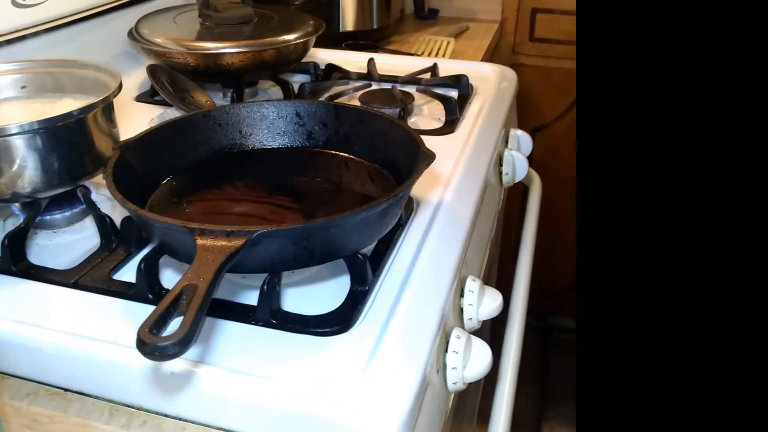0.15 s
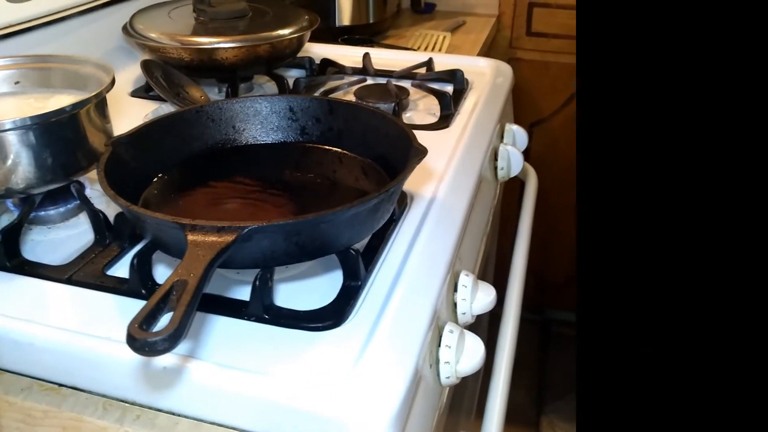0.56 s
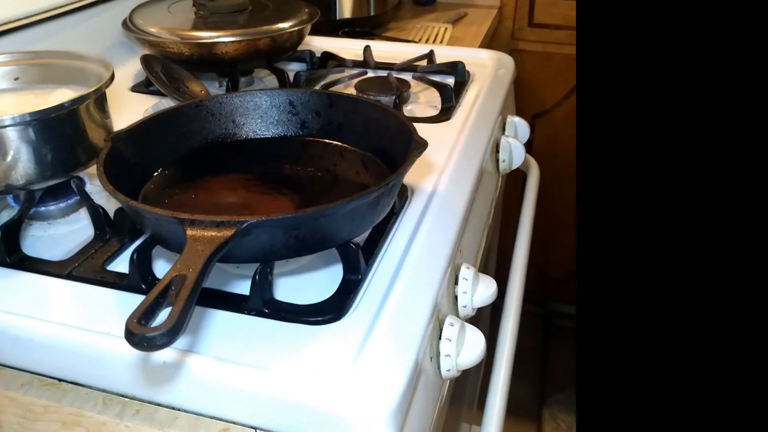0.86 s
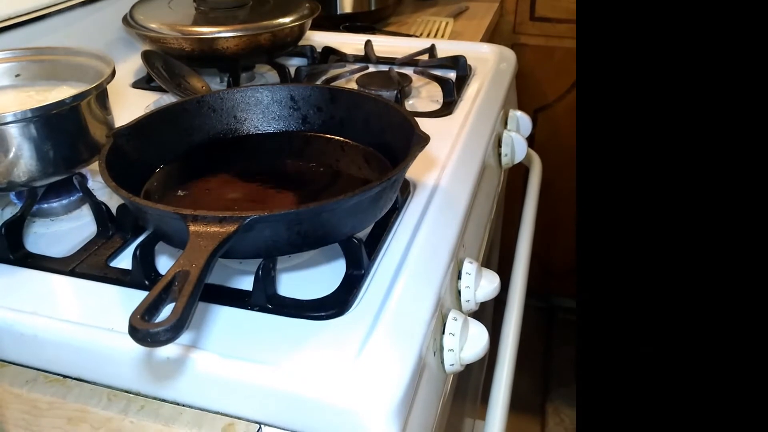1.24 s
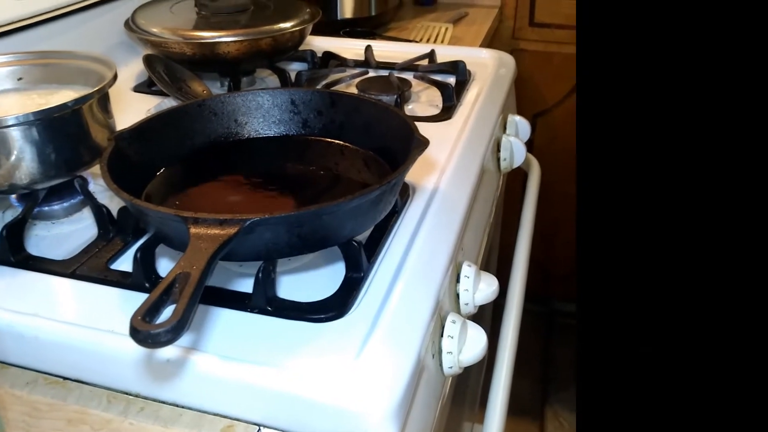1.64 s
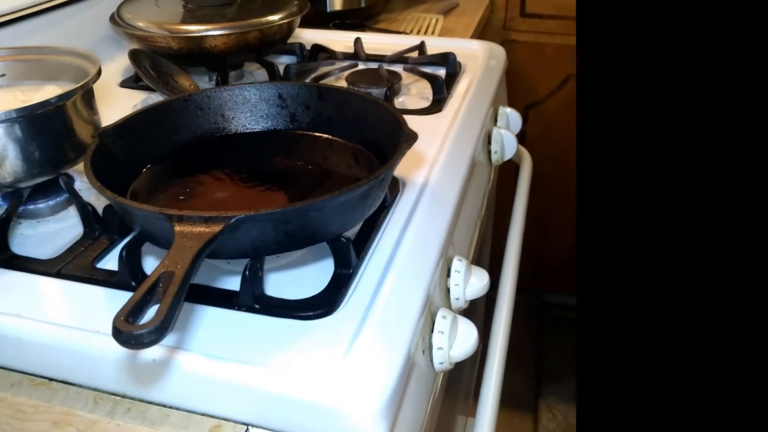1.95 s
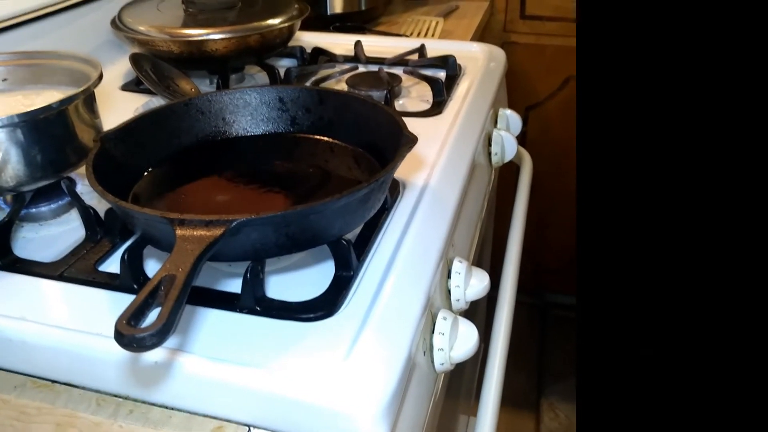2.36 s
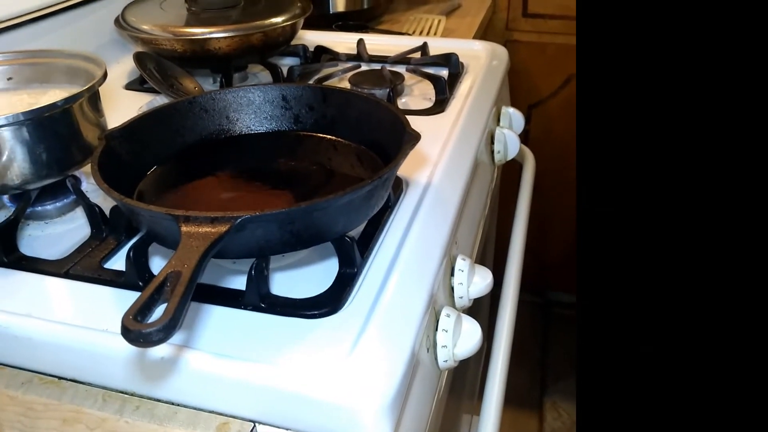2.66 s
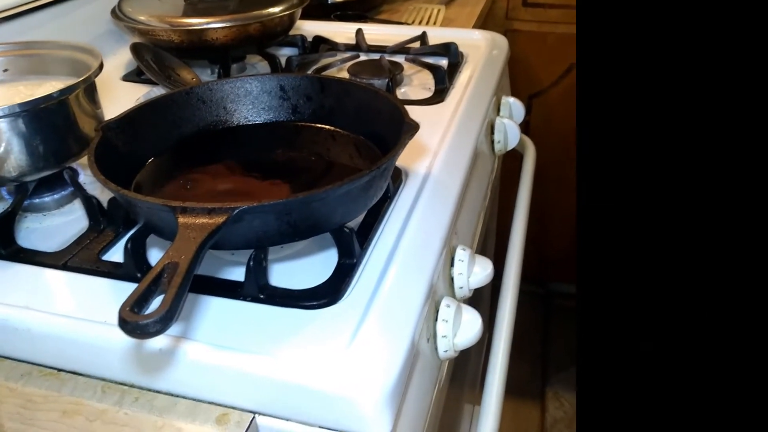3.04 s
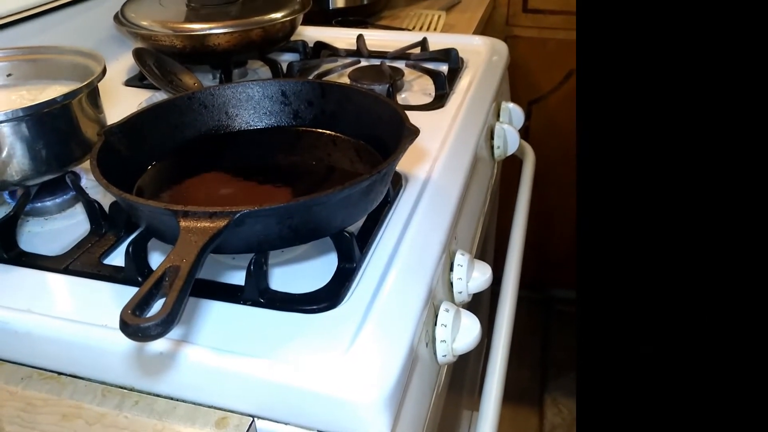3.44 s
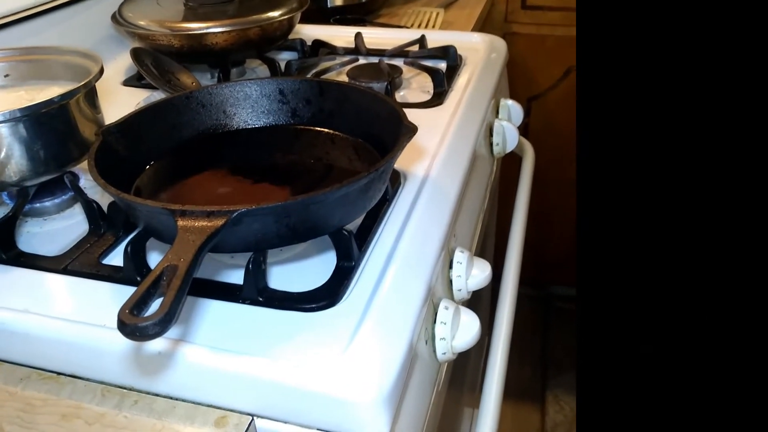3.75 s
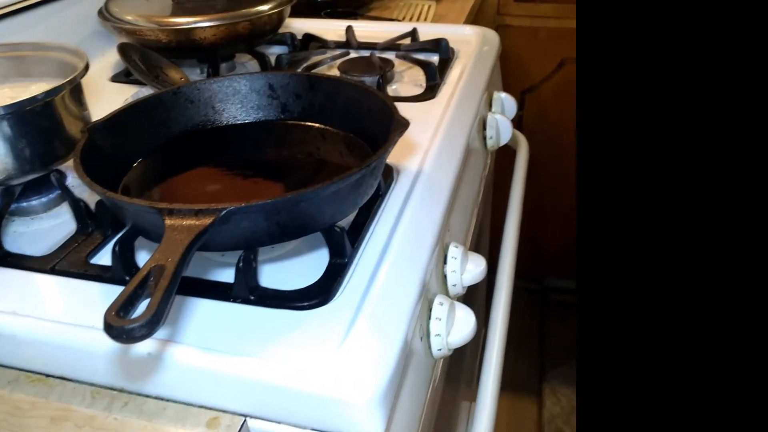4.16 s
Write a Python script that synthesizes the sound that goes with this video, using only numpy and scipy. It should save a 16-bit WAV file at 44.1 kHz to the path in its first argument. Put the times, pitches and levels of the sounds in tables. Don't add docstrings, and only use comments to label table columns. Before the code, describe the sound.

Water drops snap, crackle and spit in hot oil in a cast iron skillet, dense at first, then thinning to scattered pops.

```python
import sys
import numpy as np
from scipy import signal
from scipy.io import wavfile
from scipy.ndimage import uniform_filter1d

SR = 44100
rng = np.random.default_rng(int(sys.argv[2]) if len(sys.argv) > 2 else 0)


def amp(db):
    return 10 ** (np.asarray(db, float) / 20)


def write(x):
    x = np.atleast_2d(x).T
    wavfile.write(sys.argv[1], SR, np.round(np.clip(x, -1, 1) * 32767).astype(np.int16))


N = 189630

# t/s, peak level/dB, f/Hz, blow on the iron/dB
LARGE = [(0.0784, -11.5, 3040, 2.5), (0.2213, -5.5, 3100, 4.5), (0.2927, -1.5, 3150, 5),
         (0.394, -8, 2490, -6.5), (0.4066, -6, 3020, -1.5), (0.5276, -14.5, 3180, 12.5),
         (0.637, 0.5, 3090, 2), (0.7212, -6.5, 2900, 2), (0.7864, 0, 2340, -3.5), (0.824, 5.5, 2970, -2),
         (0.9914, -8, 2470, -8), (1.1757, -7, 3000, -1), (1.23, -1, 2920, -3.5), (1.265, -2.5, 2360, -31),
         (1.2996, -9.5, 2810, 5), (1.459, -10.5, 2780, 6.5), (1.7679, -3, 2770, -7.5),
         (1.925, 2, 3000, -4.5), (2.0626, -8.5, 3010, 1.5), (2.204, -10.5, 3100, -3),
         (2.2778, -9, 3090, 3.5), (2.3683, -6, 3080, -13), (2.3929, 0, 2280, -44),
         (2.4932, -7.5, 2470, -3.5), (2.613, -12.5, 2760, -9), (2.7893, -5.5, 2436, -4.5),
         (2.9558, -2, 2750, 1), (3.581, -4.5, 2820, -2.5), (3.7497, -8, 2760, 0), (4.1757, -6, 3065, 2)]
# t/s, peak level/dB, f/Hz
MIDDLE = [(0.0623, -6, 3580), (0.1227, -3.5, 4030), (0.2867, -2.5, 3670), (0.3007, 2.5, 3830),
          (0.36, -1, 3620), (0.491, -6.5, 3620), (0.6346, -7.5, 3530), (0.6812, 4.5, 3690),
          (0.754, -4.5, 3740), (0.9366, -2, 3600), (1.1215, -9, 3580), (1.1549, -2.5, 3660),
          (1.4421, -11, 3360), (1.629, -10, 3200), (1.712, -10, 3450), (1.7609, -9.5, 4050),
          (1.9083, -9.5, 3720), (1.9792, -5, 3690), (2.0652, -5.5, 3770), (2.1307, -4, 3410),
          (2.3568, -5, 3720), (2.591, -3.5, 3560), (2.649, -9, 4560), (3.2695, -16, 3550),
          (3.376, -10, 3340), (3.5048, -3.5, 4180), (3.553, -10.5, 3240), (3.6193, -9, 3684),
          (3.9429, -9, 3640)]
# t/s, peak level/dB, f/Hz
LESSER = [(0.1002, -14, 4430), (0.2224, -14, 4740), (0.2718, -13.5, 4500), (0.2763, -6.5, 4800),
          (0.609, -10, 5150), (0.6444, -7.5, 4860), (0.8904, -0.5, 5440), (1.0186, -12, 4800),
          (1.0879, -22, 5160), (1.1348, -13, 5200), (1.2496, -7, 5230), (1.2845, -7, 5200),
          (1.3279, -10, 4300), (1.5369, -11, 5150), (1.705, -11.5, 4660), (1.8002, -3, 4530),
          (2.2333, -12.5, 5000), (2.2782, -6.5, 4550), (2.5052, -11, 5570), (2.6738, -2, 4630),
          (2.7716, -16.5, 4550), (2.9377, -9.5, 4730), (2.9437, -18, 4640), (3.0101, -10, 4660),
          (3.0764, -4.5, 4740), (3.1772, -13, 4560), (3.7963, -13, 4500), (3.8312, -12, 4790),
          (3.8826, -7, 4460), (4.1198, -12, 4930)]
# t/s, peak level/dB, f/Hz
SMALL = [(0.1128, -3, 5840), (0.1905, -10.5, 5770), (0.2182, -15, 6160), (0.2513, -2.5, 6170),
         (0.392, -14.5, 5940), (0.4927, -7.5, 5850), (0.6649, -6, 5850), (0.7091, -11.5, 6500),
         (0.9881, -9, 6100), (1.1903, -7.5, 5300), (1.2425, -13, 6040), (1.3763, -9, 6000),
         (1.5604, -2, 5700), (1.7753, -13.5, 5730), (1.8866, -15.5, 5700), (1.94, -8.5, 5300),
         (2.0152, -12.5, 5700), (2.1489, -12, 6100), (2.1959, -9.5, 5940), (2.409, -8.5, 6450),
         (2.6968, -9, 5840), (2.9016, -10.5, 6220), (3.046, -11, 5850), (3.2817, -6, 5680),
         (3.5038, -11, 6140), (3.5473, -8, 5840), (3.7105, -18.5, 5900), (3.7815, -14.5, 5530),
         (3.7968, -11, 6330), (4.022, -19, 6160)]
# t/s, peak level/dB, f/Hz
TINY = [(0.0393, -15, 7600), (0.248, -15.5, 6900), (0.3557, -10, 6330), (0.5556, -11, 6530),
        (0.8607, -13, 6960), (1.055, -11, 7000), (1.15, -12.5, 6430), (1.4957, -11.5, 6450),
        (1.7418, -16, 7600), (1.858, -14.5, 6600), (1.9725, -10.5, 6360), (2.0337, -12.5, 6700),
        (2.3122, -11, 7300), (2.4789, -14.5, 7500), (2.574, -16, 7670), (2.6745, -15.5, 9000),
        (2.7549, -5, 6630), (3.1034, -19.5, 7800), (3.1847, -13, 7060), (3.241, -12.5, 6500),
        (3.3075, -11, 7000), (3.3514, -12.5, 7160), (3.488, -25, 6100), (3.6547, -5, 6220),
        (3.871, -15.5, 6500), (3.922, -20, 9400), (3.9415, -14.5, 6360), (4.1087, -14, 6930),
        (4.278, -12.5, 6500)]
# t/s, peak level/dB, f/Hz
FURTHER = [(0.6405, -14, 6800), (0.819, -18.5, 8340), (0.821, -8.5, 3920), (0.823, -15.5, 5430),
           (1.0972, -13.5, 4140), (1.4038, -11.5, 3830), (1.4148, -10, 3620), (1.4284, -21.5, 6450),
           (1.4971, -9.5, 3730), (1.6292, -16, 6200), (1.7943, -14, 3700), (1.816, -18, 6800),
           (2.6503, -12.5, 3020), (2.965, -10.5, 2800), (3.178, -20, 6500), (3.928, -16.5, 4640),
           (4.165, -23.5, 6600)]
# t/s, peak level/dB, f/Hz
OPENING = [
    (.001, -17.5, 6400),
    (.002, -9, 3720),
    (.002, -12.5, 6670),
    (.003, -14.5, 2730),
]
# f/Hz, level/dB
IRON = [(1437, -57), (1723, -56), (2132, -41), (2503, -39), (2680, -49), (2900, -49), (2982, -37),
        (3350, -51), (3892, -31), (3973, -41), (4393, -45), (4942, -34.5), (5044, -49), (5480, -48),
        (5771, -46), (5981, -41), (6045, -39), (6115, -42), (6298, -43), (6428, -45), (6498, -43),
        (6756, -40), (7009, -48), (7348, -49), (7553, -50), (7698, -46), (7779, -47), (7903, -46),
        (8253, -49), (8436, -49), (8877, -56), (9249, -58), (10500, -60), (11768, -62)]


def rms_one(x):
    return x / np.sqrt(np.mean(x ** 2) + 1e-20)


def in_time(rows):
    s, *columns = np.transpose(rows)
    return [np.interp(np.arange(N) / SR, s, c) for c in columns]


def at_hz(points, hz):
    f, value = np.array(points).T[:2]
    return np.interp(np.log(hz), np.log(f), value)


def ring(clicks, hz, t60):
    r, w = amp(-60 / (t60 * SR)), 2 * np.pi * hz / SR
    return signal.lfilter([0, np.sin(w)], [1, -2 * r * np.cos(w), r * r], clicks + 1e-18)


def clicks_at(seconds, sizes):
    return np.bincount(np.clip((seconds * SR).astype(int), 0, N - 1), sizes, N)


def band_pass(x, low_hz, high_hz):
    return signal.sosfilt(signal.butter(2, [low_hz, high_hz], "band", fs=SR, output="sos"), x)


def ticks(rows, low_hz, high_hz, level_db):
    s, db = np.transpose(rows)
    return band_pass(clicks_at(s, amp(db + level_db)) + 1e-18, low_hz, high_hz)


def coloured(x, spectrum):
    edges = 24 * 2 ** np.arange(0, 9.6, .5)
    return sum(amp(at_hz(spectrum, np.sqrt(low * high))) * band_pass(x, low, high)
               for low, high in zip(edges, edges[1:]))


def echo(x, t60, onset_s):
    t = np.arange(SR // 2) / SR
    white = rng.standard_normal(len(t))
    edges = 200 * 2 ** np.arange(0, 6.6, .5)
    tail = 0
    for low, high in zip(edges, edges[1:]):
        tail = tail + band_pass(white, low, high) * amp(-60 * t / at_hz(t60, np.sqrt(low * high)))
    tail = tail * (1 - np.exp(-t / onset_s))
    return signal.fftconvolve(x, tail / np.sqrt(np.sum(tail ** 2)))[:N]


def bubbles(rows, cycles, rise, swell_s):
    out = np.zeros(N + SR)
    for (s, db, hz), turns in zip(rows, cycles):
        t = np.arange(int(min(turns / hz, .5) * SR) + 2) / SR
        life = t * hz / turns
        shape = amp(db - 60 * life) * (1 - np.exp(-t / swell_s)) ** 2
        at = int(s * SR)
        out[at:at + len(t)] += shape * np.sin(2 * np.pi * hz * t * (1 + rise * life))
    return out[:N]


def room_tone():
    # f/Hz, rms level/dB
    motor = [
        (59.2, -60.5),
        (156.1, -73),
    ]
    # f/Hz, level/dB
    kitchen = [(25, -17), (60, -11), (200, -21.5), (600, -38), (1500, -27), (4000, -17), (16000, -54)]
    # t/s, level/dB
    gain = [(0, -54), (.6, -73), (1.2, -69.5), (2.0, -62.5), (4.3, -59.5)]
    t = np.arange(N) / SR
    flutter = rms_one(signal.lfilter([1], [1, -1.99, .990025], rng.standard_normal(N)))
    hum = sum(amp(db - motor[0][1]) * np.sin(2 * np.pi * hz * t) for hz, db in motor)
    hum = hum * (1 + .2 * flutter)
    hiss = rms_one(coloured(rng.standard_normal(N), kitchen))
    return amp(in_time(gain)[0]) * (amp(8.0) * hum + amp(12.5) * hiss)


def simmer():
    # t/s, peak level/dB, f/Hz
    slow = np.array([(0.176, -54, 475), (0.291, -37, 1115), (0.43, -34, 866), (0.455, -30.5, 493),
                     (0.525, -35, 465), (1.461, -37, 890), (1.565, -35, 926), (1.697, -34.5, 917),
                     (1.756, -32, 555), (2.147, -42, 354), (2.312, -33, 987), (2.911, -41, 354),
                     (3.107, -39.5, 936), (3.146, -40, 368), (3.321, -40, 980), (3.372, -35.5, 592),
                     (3.399, -32.5, 500), (3.457, -36, 923), (3.605, -38, 980), (3.712, -37, 335),
                     (3.717, -36, 585), (3.754, -41, 334), (3.793, -37, 598), (3.96, -40, 389),
                     (4.0, -38, 361), (4.003, -35, 994), (4.045, -37, 370), (4.166, -32, 985)])
    # t/s, level/dB
    froth_level = [(0, -49), (.4, -44), (1.2, -57), (2.5, -63), (4.3, -62)]
    chance = rng.random((260, 3))
    when = chance[:, 0] * N / SR
    froth_db = np.interp(when, *np.transpose(froth_level)) + 9 * chance[:, 1]
    small = np.transpose([when, froth_db, 300 * 3.35 ** chance[:, 2]])
    froth = bubbles(small, small[:, 2] * 0.06, rise=0.36, swell_s=0.00042)
    wobble = rms_one(signal.lfilter([1], [1, -1.98, .9801], rng.standard_normal(N)))
    big = bubbles(slow, slow[:, 2] * 0.098, rise=0.138, swell_s=0.0043)
    return big * (1 + 0.55 * wobble) + froth


def thumps():
    # t/s, peak level/dB
    thrown = [(0.225, -31), (0.182, -15.5), (0.293, -13.5), (0.324, -12), (0.43, -17), (0.53, -30),
              (0.639, -26), (0.719, -23), (0.785, -16.5), (0.824, -19.5), (0.943, -20), (1.277, -23),
              (1.441, -32), (1.566, -32.5), (1.886, -26), (1.924, -25.5), (2.129, -31.5), (2.389, -21),
              (2.489, -23.5), (2.593, -30), (2.788, -21), (2.965, -26), (3.076, -31.5), (3.578, -31),
              (4.169, -30)]
    # f/Hz, T60/s
    slosh_t60 = [(300, 0.015), (1300, 0.12)]
    thud = ticks(np.add(thrown, [.003, 0]), 425, 2900, 24.2)
    splash = ticks([row[:2] for row in LARGE + MIDDLE], 61, 1140, -8.0)
    return thud + splash + amp(-0.5) * echo(thud, slosh_t60, onset_s=0.0013)


def spits():
    # t/s, peak level/dB
    spat = [(0.0997, -12), (0.3197, 11.5), (0.3611, 0), (0.4903, 2.5), (1.242, -23), (1.3758, 2.5),
            (1.5354, -15), (1.7495, -6), (1.8899, 5), (2.1288, 3), (2.1954, -14), (2.3116, -8),
            (2.4603, -16), (2.5257, -11), (2.7313, -5), (2.8452, -6), (2.884, -17), (3.0693, 4),
            (3.1423, -9), (3.243, -18), (3.5064, -1), (3.6174, -8), (3.7223, -23), (3.7744, -10),
            (4.0477, -5.5), (4.11, -3), (4.1954, -23)]
    return ticks(spat, 4050, 9500, 9)


def mist(drops):
    # t/s, peak level/dB
    finest = [(0.0782, -24), (0.1246, -26), (0.1645, -19), (0.2728, -16), (0.3197, -23), (0.3611, -18),
              (0.4055, -14), (0.4663, -12), (0.5516, -20), (0.5746, -12), (0.6684, -22), (0.6814, -16),
              (0.8215, -13), (0.8594, -28.5), (1.2261, -15), (1.2431, -27), (1.3274, -20), (1.3758, -30),
              (1.493, -22), (1.5349, -33), (1.7045, -26), (1.8582, -32), (1.8886, -14), (2.1301, -14),
              (2.1405, -18), (2.3326, -24), (2.4084, -29), (2.4608, -20), (2.5257, -27), (2.5551, -22),
              (2.6369, -35), (2.6733, -26), (2.8449, -16), (2.8833, -13.5), (3.045, -15), (3.1418, -20),
              (3.243, -24), (3.3523, -29), (3.488, -48), (3.5044, -19), (3.5463, -27), (3.6187, -20),
              (3.7209, -30), (3.7214, -28), (3.7738, -35), (3.9414, -29), (4.1081, -33), (4.1749, -20),
              (4.198, -25), (4.2682, -23)]
    # f/Hz, T60/s
    mist_t60 = [(8000, .04), (15000, .045)]
    spray = ticks(drops[1::3, :2], 9000, 16500, 3.0) + ticks(finest, 8000, 12300, 14.7)
    return amp(-3) * spray + echo(spray, mist_t60, onset_s=.0005)


def droplets(count):
    # t/s, level/dB
    course = [(0, -24.5), (.9, -24.5), (2.0, -28.5), (3.0, -32), (4.3, -32)]
    # f/Hz, level/dB
    colour = [(2000, 13), (4000, 12.8), (6500, 9.3), (9000, 10.7), (12000, 6.9)]
    parents = OPENING + [row[:3] for row in LARGE] + MIDDLE + LESSER + SMALL + TINY + FURTHER
    s, db, pitch = np.transpose(parents)
    chance = rng.random((count, 4))
    share = np.cumsum(np.sqrt(amp(db)))
    parent = np.searchsorted(share / share[-1], chance[:, 0])
    when = s[parent] - .022 * np.log(1 - chance[:, 1])
    lowest = np.maximum(.8 * pitch[parent], 4400)
    hz = lowest * (12600 / lowest) ** chance[:, 2] ** 1.45
    size_db = np.interp(when, *np.transpose(course)) + at_hz(colour, hz)
    size_db = size_db - 1.27 * np.log(1 - .9 * chance[:, 3])
    return np.transpose([np.minimum(when, N / SR), size_db, hz])


def iron(rows, reach, spread_db):
    # f/Hz, level/dB
    drive = [(1400, 13), (2200, 7), (3000, -5.5), (4500, 3), (6300, 5.5), (9000, 20.5)]
    s, db, pitch = np.transpose(rows)
    place = rng.normal(0, 1, (len(s), len(IRON)))
    out = []
    for (hz, mode_db), luck in zip(IRON, place.T):
        near = 1 / np.hypot(1, (hz / pitch - pitch / hz) / reach)
        near = near * np.minimum(pitch / hz, 1) ** 1.8 * np.minimum(hz / pitch, 1) ** 0.37
        blow_db = db + mode_db + at_hz(drive, hz) + spread_db * np.abs(luck)
        out.append(clicks_at(s, near * np.sign(luck) * amp(blow_db)))
    return np.array(out)


def skillet(strikes):
    # f/Hz, T60/s
    iron_t60 = [(1400, 0.28), (2500, 0.32), (5000, 0.16), (6500, 0.13), (8500, 0.062), (12000, 0.17)]
    swell_share, swell_t60_s = 0.56, 0.017
    return sum(ring(row, hz, at_hz(iron_t60, hz)) - swell_share * ring(row, hz, swell_t60_s)
               for row, (hz, _) in zip(strikes, IRON))


def bursts(rows, own_db, iron_db, cycles):
    rows = np.array(rows)
    own = bubbles(rows[:, :3], [cycles] * len(rows), rise=.1, swell_s=.00013)
    blows = rows[:, :3] + np.outer(rows[:, 3:].sum(axis=1), [0, 1, 0])
    return np.vstack([amp(own_db) * own, amp(iron_db) * iron(blows, reach=0.07, spread_db=3.0)])


def all_bursts(drops):
    # t/s, peak level/dB, f/Hz
    between = [(0.0782, -25, 5680), (0.0786, -11, 7000), (0.2469, -8, 7100), (0.3213, -1, 2840),
               (0.3942, -12, 6400), (0.4055, -26, 3530), (0.4247, -10.5, 6300), (0.5154, -7, 5500),
               (0.5582, -1.5, 3750), (0.6721, -18, 3700), (0.7077, -10, 6800), (0.7215, -11, 2600),
               (0.7247, -11, 6260), (0.7389, -3, 7070), (0.7813, -31, 3870), (0.8586, -26, 2840),
               (0.9228, 0, 6500), (0.9718, -4, 5700), (1.0734, -4.5, 6660), (1.0883, -8, 5700),
               (1.1115, -12, 6760), (1.1485, -12, 6940), (1.1667, -1, 4020), (1.1928, -25, 3960),
               (1.1982, -13, 5000), (1.2149, -30, 4070), (1.2838, 1, 4700), (1.3364, -5.5, 4740),
               (1.4282, -8, 6950), (1.4613, -10.5, 2820), (1.4925, -25, 6290), (1.5073, -6, 6400),
               (1.5799, -22, 5930), (1.5864, -4, 5850), (1.6107, -6.5, 7100), (1.7954, -3, 4840),
               (1.8585, -15, 6800), (1.8792, -13, 4930), (1.9021, -6, 6870), (1.9645, -6, 3570),
               (1.9801, -9, 3970), (1.9852, -9, 5900), (2.0283, -9, 4810), (2.0414, -21, 6600),
               (2.1444, -6, 5600), (2.2221, -11, 6150), (2.2613, -8, 6100), (2.3349, -14, 6070),
               (2.4608, -13, 3780), (2.4869, -10, 5800), (2.5932, -4, 3880), (2.6506, -19, 3120),
               (2.6658, -9, 4430), (2.6988, -31, 3860), (2.808, -10.5, 6170), (2.9049, -13, 6100),
               (2.968, -33, 2880), (3.5394, -14, 6000), (3.5496, -29, 5900), (3.6131, -9.5, 3440)]
    # t/s, peak level/dB, f/Hz
    sparks = [(0.0488, -15, 9350), (0.0996, -13, 9400), (0.3169, 0.5, 8100), (0.4864, -11.5, 9300),
              (0.5034, -8.5, 7850), (0.5923, -5, 8650), (0.6816, -20, 11900), (0.7088, -11, 8400),
              (0.8227, -23, 9900), (0.8601, -34, 7800), (0.8895, -11, 8100), (0.9443, -7, 9500),
              (1.0593, -8.5, 8100), (1.1482, -17, 8150), (1.2537, -11, 8440), (1.2875, -9, 7640),
              (1.3208, -12.5, 8100), (1.4725, -17, 9500), (1.5059, -29, 12000), (1.5218, -13, 7800),
              (1.5353, -18, 10400), (1.5726, -12.5, 8100), (1.5737, -16, 10400), (1.6292, -17.5, 7800),
              (1.762, -13, 8700), (1.8106, -22, 8850), (1.8168, -20, 7660), (1.9757, -8.5, 8540),
              (2.1368, -14, 8900), (2.1731, -14, 10400), (2.2047, -8.5, 8700), (2.2275, -14, 9400),
              (2.3233, -12.5, 8500), (2.4597, -11.5, 8800), (2.5254, -7.5, 8540), (2.6963, -16, 6800),
              (2.8142, -13.5, 8700), (2.8447, -25, 12900), (2.8447, -21, 9900), (2.8447, -21, 8450),
              (2.8969, -11, 7300), (2.9535, -16, 7750), (2.9586, -14, 7200), (3.0765, -13, 9400),
              (3.0928, -10.5, 8500), (3.1414, -21, 12230), (3.1578, -17, 11300), (3.1694, -11, 9670),
              (3.1882, -15, 8000), (3.2452, -17, 7900), (3.2826, -8.5, 8700), (3.5046, -10.5, 8500),
              (3.5286, -12, 8500), (3.5648, -14, 8700), (3.5794, -19, 7500), (3.6189, -15, 8400),
              (3.7212, -14, 12000), (3.7742, -14, 8500), (3.887, -16, 8400), (3.8983, -18, 10400)]
    struck = bursts(LARGE, 1.0, 24.22, 22)
    struck = struck + bursts(MIDDLE + LESSER + FURTHER, 4.35, 22.26, 25.2)
    struck = struck + bursts(SMALL + TINY + OPENING, 11.7, 20.96, 19)
    struck = struck + bursts(between, 8.1, 16.2, 13.0)
    struck = struck + bursts(sparks, 8.2, 17.8, 21.6)
    return struck + bursts(drops, 11.5, 19.5, 16.5)


def pan():
    # f/Hz, T60/s
    hollow_t60 = [(1500, 0.18), (2400, 0.012), (4000, 0.066), (9000, 0.041), (15000, 0.033)]
    drops = droplets(count=450)
    struck = all_bursts(drops)
    knock = ticks([row[:2] for row in LARGE + MIDDLE], 1385, 2030, 4.8)
    steam = struck[0] + spits() + mist(drops) + knock
    sound = steam + amp(-6) * echo(steam, hollow_t60, onset_s=0.00078) + amp(2.0) * skillet(struck[1:])
    return signal.sosfilt(signal.butter(8, 1250, "high", fs=SR, output="sos"), sound)


def scene():
    # f/Hz, T60/s
    room_t60 = [(500, 0.38), (1300, 0.38), (3000, 0.32), (8000, 0.23), (15000, 0.18)]
    near = pan() + thumps() + amp(-2) * simmer()
    near = np.roll(near, 30)
    return (near + amp(-5.5) * echo(near, room_t60, onset_s=0.00026) + room_tone())[None]


def band_limit(x):
    return signal.sosfilt(signal.butter(12, 16320, fs=SR, output="sos"), x)


def record(dry):
    # from t/s, to t/s, below f/Hz
    dropout = (.605, .634, 2000)
    x = signal.sosfilt(signal.butter(1, 11000, fs=SR, output="sos"), dry)
    over_db = np.maximum(20 * np.log10(np.abs(x) / .42 + 1e-9), 0)
    t = np.arange(N) / SR
    fall_db = 900 * t
    held_db = np.maximum.accumulate(over_db + fall_db, axis=1) - fall_db
    x = x * amp(-.75 * uniform_filter1d(np.roll(held_db, -4), size=9))
    from_s, to_s, below_hz = dropout
    bass = signal.sosfiltfilt(signal.butter(4, below_hz, fs=SR, output="sos"), x)
    x = x - bass * uniform_filter1d(1. * (t > from_s) * (t < to_s), size=200)
    top_cut = signal.ellip(10, .5, 70, 15850, fs=SR, output="sos")
    return band_limit(signal.sosfilt(top_cut, x))


dry = scene()
out = record(dry)
write(out)
```